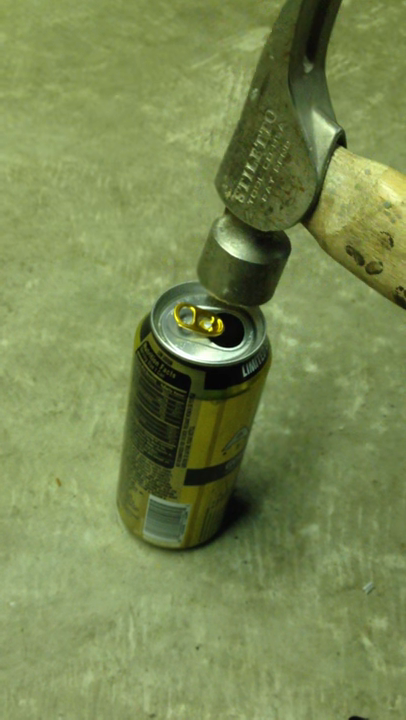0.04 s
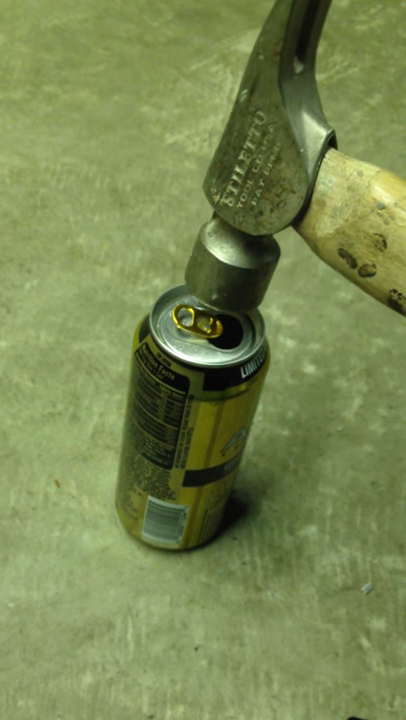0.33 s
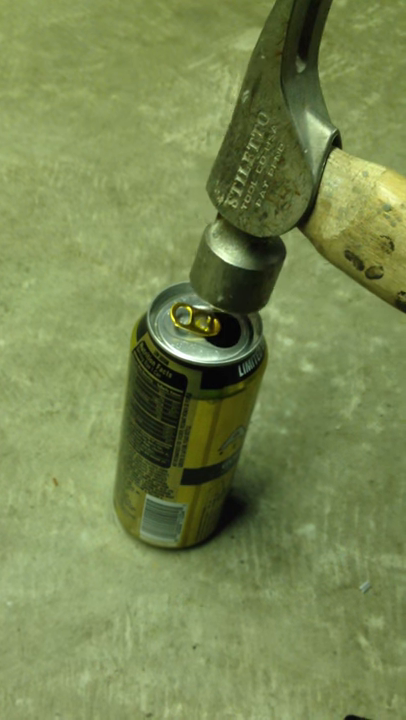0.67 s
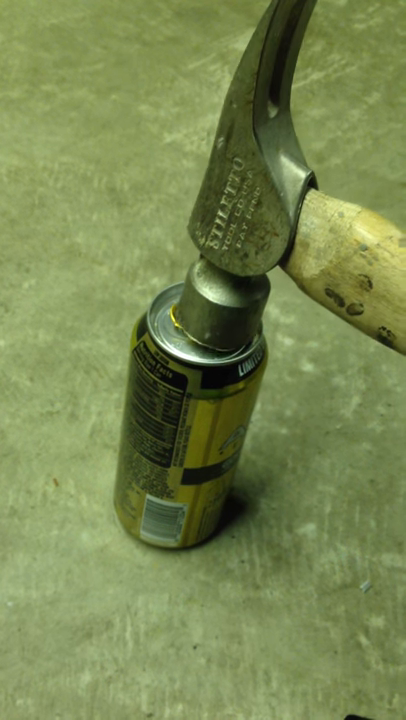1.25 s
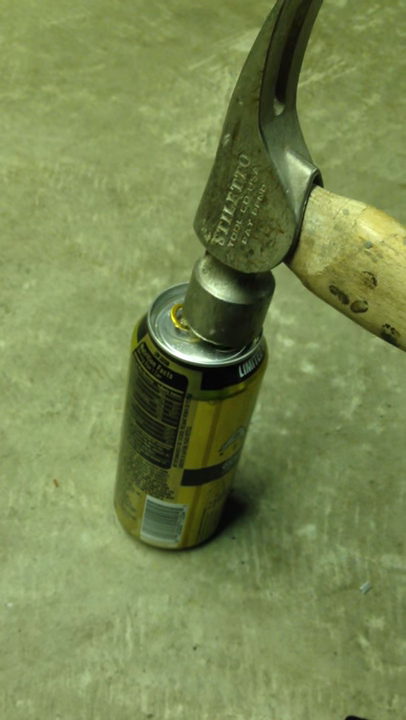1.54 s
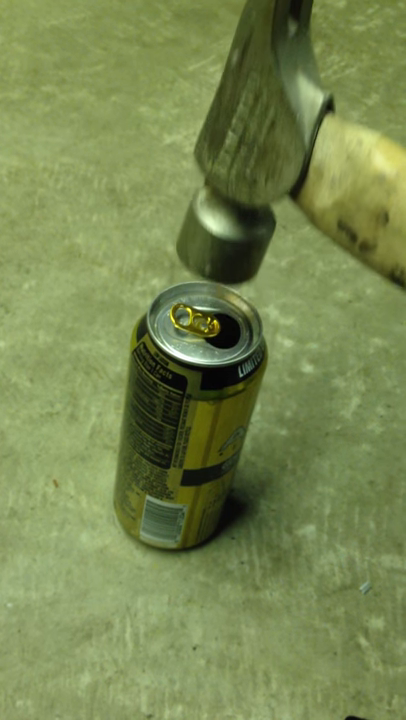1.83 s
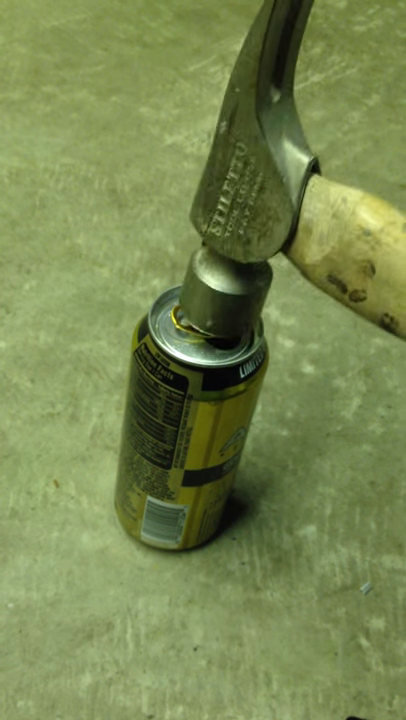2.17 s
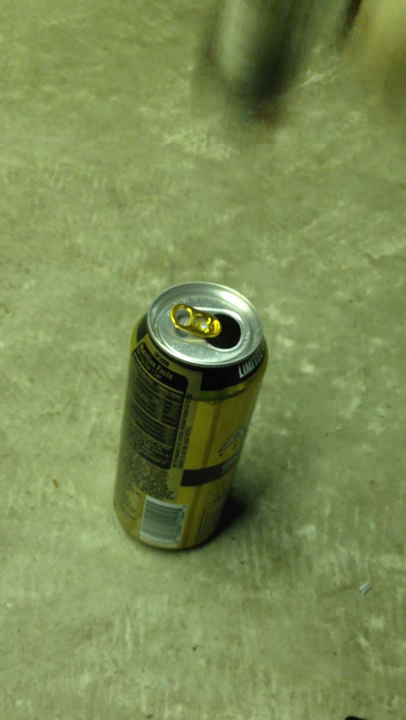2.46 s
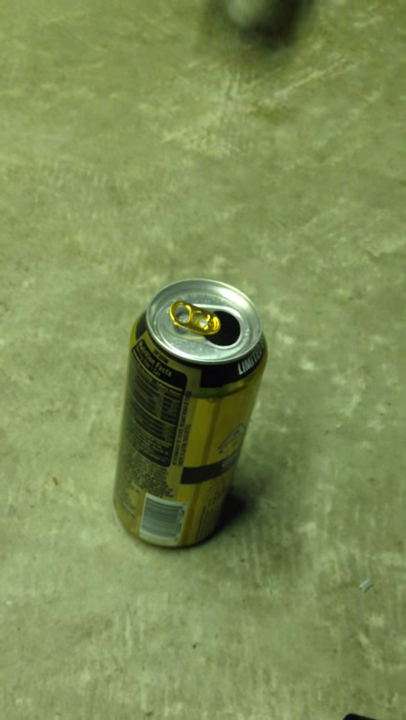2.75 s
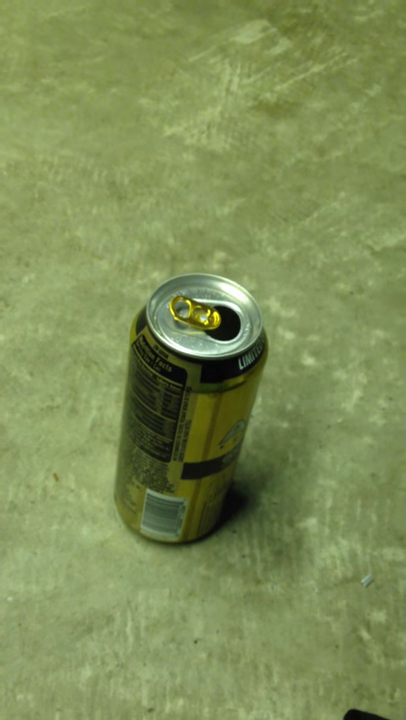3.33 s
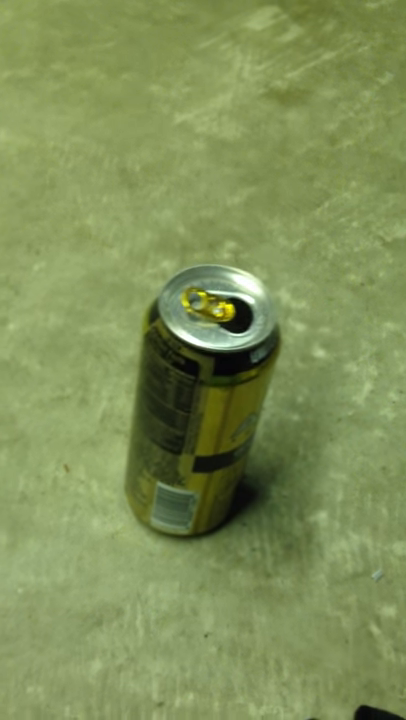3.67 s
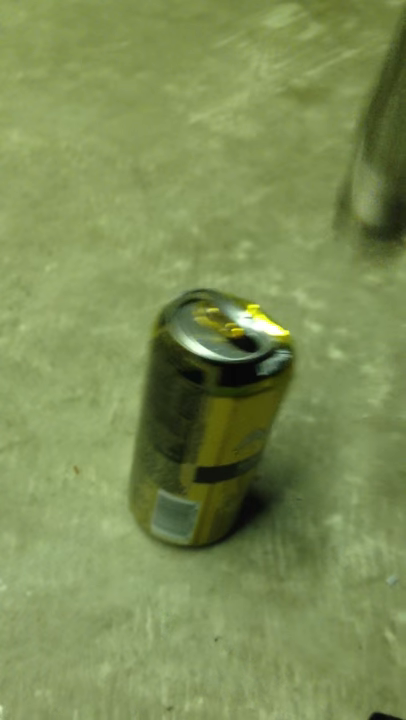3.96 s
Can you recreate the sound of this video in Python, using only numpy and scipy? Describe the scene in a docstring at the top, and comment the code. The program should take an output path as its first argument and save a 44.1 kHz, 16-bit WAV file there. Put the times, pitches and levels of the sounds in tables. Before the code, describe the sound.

One sharp, crunching hammer blow on an empty can follows a light tink and quiet hum.

```python
"""In a small hard room, an empty drink can stands on the concrete floor. A hammer is lined up,
touches the lid once, then swings down. The impact excites the can's modes: the lid cracks and clanks,
the can thumps against the floor, and its thin wall buckles and rings. The room reverberates and
the bang overloads the microphone. Underneath are mains hum, faint hiss and the swish of the arm."""
import sys
import numpy as np
from scipy import signal
from scipy.fft import rfft, irfft
from scipy.io import wavfile

SR = 44100
rng = np.random.default_rng(int(sys.argv[2]) if len(sys.argv) > 2 else 0)


def output_pcm(signal):
    """Save a mono or channel-first signal as 16-bit PCM at the path in sys.argv[1].

    Samples are clipped to [-1, 1] before scaling.
    """
    pcm = np.clip(np.atleast_2d(signal).T, -1, 1) * 32767
    wavfile.write(sys.argv[1], SR, np.round(pcm).astype(np.int16))


N = 176400
EVENT_N = 16384  # samples in one impact
BLOW_S = 3.8413

def undb(db):
    """Amplitude ratio of a level in decibels."""
    return 10 ** (np.asarray(db) / 20)

def since(start):
    """Seconds since an onset within one impact, zero before it."""
    return np.maximum(np.arange(EVENT_N) / SR - start, 0)

def fade(start, t60):
    """Exponential decay from a sudden onset, 60 dB in t60 seconds."""
    age = since(start)
    return (age > 0) * np.exp(-np.log(1000) * age / t60)

def on_log(hz, points, column=1):
    """Interpolation of a table column on a log-frequency axis."""
    points = np.array(points, float)
    return np.interp(np.log(np.maximum(hz, 1)), np.log(points[:, 0]), points[:, column])

def colour(x, points):
    """Spectral shaping by relative levels, conserving the power of white noise."""
    gain = undb(on_log(np.fft.rfftfreq(len(x), 1 / SR), points))
    return irfft(rfft(x) * gain / np.sqrt(np.mean(gain ** 2)), len(x))

def noise(points, size=N):
    """Coloured Gaussian noise of unit power."""
    return colour(rng.standard_normal(size), points)

def ring(start, modes, wave=np.sin):
    """Free vibration: a sum of damped modes excited together."""
    age = since(start)
    return sum(undb(db) * fade(start, t60) * wave(2 * np.pi * hz * age) for hz, db, t60 in modes)

def place(x, start):
    """Delay of a short sound to its time in the scene."""
    return np.concatenate([np.zeros(int(start * SR)), x, np.zeros(N)])[:N]

# Partials of the hum (multiple of hum_hz, level/dB)
HUM_PARTIALS = [(1, -74), (2, -82.5), (2.5, -79.5), (3, -65.5), (4, -72.5), (5, -75), (6, -75), (7, -85.5),
                (8, -79.5), (9, -85.5), (10, -85.5), (11, -82.5), (12, -79), (14, -85), (15, -82.5),
                (16, -86), (20, -90.5), (21, -91)]

def mains_hum(hum_hz=120.1, scatter_rad=1.08):
    """Harmonic series: steady multiples of the mains frequency, loosely aligned in phase."""
    phase = 2 * np.pi * hum_hz * np.arange(N) / SR
    offsets = scatter_rad * rng.standard_normal(len(HUM_PARTIALS))
    return sum(np.sqrt(2) * undb(db) * np.cos(multiple * phase + offset)
               for (multiple, db), offset in zip(HUM_PARTIALS, offsets))

# Spectral density of the hiss (f/Hz, relative level/dB)
HISS_SPECTRUM = [(25, -28), (60, -24), (90, -9.5), (120, 0.5), (200, 1.5), (320, -2.5), (550, -6.5),
                 (1000, -9.5), (1700, -13.5), (2800, -16), (4300, -14.5), (5500, -16.5), (7200, -16),
                 (9800, -26.5), (12000, -21), (14500, -16.5), (16000, -19)]

def hiss(level_db=-68):
    """Stationary broadband noise of the air and the microphone."""
    return undb(level_db) * noise(HISS_SPECTRUM)

# Aiming and lifting movements (centre t/s, half-width/s, level/dB)
ARM_MOVES = [(0.31, 0.35, -71.5), (2.593, 0.19, -68.5), (3.4, .15, -78)]
# Spectral density of their swish (f/Hz, relative level/dB)
SWISH_SPECTRUM = [(100, -15), (200, 3), (320, 0.5), (500, -11), (900, -6.5), (2000, -12), (4000, -27),
                  (15000, -43)]
# Spectral density of the downswing (f/Hz, relative level/dB)
DOWNSWING_SPECTRUM = [(100, -17), (250, 4), (700, -5), (2000, -5.5), (4500, -10), (8000, -20), (15000, -38)]

def arm(swing_db=-53.5, rise_s=0.035):
    """Noise of motion: arm and hammer swish softly, then a rush grows exponentially up to the blow."""
    t = np.arange(N) / SR
    moves = sum(undb(db) * np.exp(-((t - centre) / half) ** 2) for centre, half, db in ARM_MOVES)
    swing = (t < BLOW_S) * np.exp(-np.abs(t - BLOW_S) / rise_s)
    return moves * noise(SWISH_SPECTRUM) + undb(swing_db) * swing * noise(DOWNSWING_SPECTRUM)

# Spectral density and decay of the reflections (f/Hz, relative level/dB, T60/s)
ROOM_RESPONSE = [(60.7, -40, .3), (172, -10.5, 0.62), (300, -9, 0.54), (650, -14, .5), (900, -7, 0.83),
                 (1170, -10, 0.54), (1750, -2.5, 0.71), (2600, 1.5, 0.58), (3250, -4.5, 0.55),
                 (4300, 1.5, 0.42), (5530, -3, 0.5), (7400, 2.5, 0.37), (8550, 1, .34), (9500, -12, 0.4),
                 (12000, -7.5, 0.35), (15500, -12, 0.31)]

def reverberation(build_s=0.0065):
    """Diffuse field: dense reflections merge into noise, each band decaying at its own rate."""
    edges = np.geomspace(50, 16000, 41)
    centres = np.sqrt(edges[1:] * edges[:-1])
    t60s = on_log(centres, ROOM_RESPONSE, column=2)
    hz = np.fft.rfftfreq(EVENT_N, 1 / SR)
    spectrum = rfft(noise(ROOM_RESPONSE, EVENT_N))
    tail = sum(irfft(spectrum * ((hz >= low) & (hz < high))) * fade(0, t60)
               for low, high, t60 in zip(edges, edges[1:], t60s))
    return tail * (1 - np.exp(-since(0) / build_s))

# The hammer's light contact and its rebound (t/s, level/dB)
TOUCH_CONTACTS = [(1.3584, -46.5), (1.3648, -52)]
# Modes of the intact lid (f/Hz, relative level/dB, T60/s)
INTACT_LID_MODES = [(2480, -12.5, 0.037), (3128, -19, .05), (4620, -2.5, 0.039), (4670, -9, .03),
                    (4660, -13, 0.13), (5830, -22, .05), (7025, -16.5, .055), (8500, -22, .03)]

def touch(room, tick_db=-15, rise_s=0.00036, room_db=-17.5):
    """Light impact excitation: the lid tinks, and convolution with the room adds the reflections."""
    tick = undb(tick_db) * noise(CAN_NOISE_SPECTRUM, EVENT_N) * fade(0, t60=0.035)
    tink = (ring(0, INTACT_LID_MODES) + tick) * (1 - np.exp(-since(0) / rise_s))
    reflections = signal.fftconvolve(tink, room / np.linalg.norm(room))[:EVENT_N]
    contact = tink + undb(room_db) * reflections
    return sum(place(undb(db) * contact, start) for start, db in TOUCH_CONTACTS)

# Low modes of the can against the floor (f/Hz, relative level/dB, T60/s)
CAN_FLOOR_MODES = [(169, -19.5, 0.043), (265, -15, 0.029), (370, -18, 0.028), (472, -21.5, 0.036)]

def thump(lag_s=0.00149, pulse_db=-16.5, pulse_s=0.00039):
    """Impulse response of the can driven against the floor: a pressure pulse and damped low modes."""
    age = since(lag_s) / pulse_s
    pulse = undb(pulse_db) * age * np.exp(1 - age)
    return ring(lag_s, CAN_FLOOR_MODES, np.cos) + pulse

# Spectral density of the wall's snaps, also of the touch's tick (f/Hz, relative level/dB)
CAN_NOISE_SPECTRUM = [(60, -34), (300, -6.5), (800, -13), (1150, -13.5), (1450, -2.5), (3200, -3),
                      (4400, -0.5), (5500, -5.5), (7000, 3.5), (9800, -9), (12000, -6), (15500, -7)]
# Modes of the thin wall and the air inside (f/Hz, relative level/dB, T60/s)
SHELL_MODES = [(777, -41, 2), (871, -37.5, 1.5), (888, -46, 1.2), (1066, -43, .5), (1347, -21, .09),
               (1365, -32, .35), (1510, -33, .15), (1691, -41, 1.3), (1781, -36, .8), (1843, -31, .32),
               (2016, -30, .32), (2230, -27, .2), (2448, -24, .2), (2612, -27, .25), (2650, -26, .3),
               (2826, -29, .32), (2903, -41, .9), (3476, -22, .11), (3640, -38, .75), (4150, -26, .19),
               (4367, -30, .25), (4879, -20, .07), (6583, -30, .2), (7010, -29, .19), (7300, -27, .19),
               (7413, -27, .19), (7601, -24, .1), (8250, -26, .16), (8705, -32, .18), (10947, -36, .18),
               (11952, -34, .18)]

def wall_buckling(lag_s=0.005, snaps_per_s=2900, crumple_db=-10, ring_db=-1.5):
    """Buckling of a thin shell: the wall gives way in tiny random snaps and its modes ring on."""
    chance = snaps_per_s / SR
    snaps = rng.standard_normal(EVENT_N) * (rng.random(EVENT_N) < chance) / np.sqrt(chance)
    crumple = undb(crumple_db) * colour(snaps, CAN_NOISE_SPECTRUM) * fade(lag_s, t60=0.1)
    return crumple + undb(ring_db) * ring(lag_s, SHELL_MODES)

# Spectral density of the crack at first contact (f/Hz, relative level/dB)
CRACK_SPECTRUM = [(60, -27), (200, -13), (800, -13), (1000, -11), (1300, -14), (1800, -8), (2800, -1.5),
                  (4500, -13), (7000, -11), (9800, -20), (12000, -3.5), (15500, -19)]
# Modes of the dented lid (f/Hz, relative level/dB, T60/s)
DENTED_LID_MODES = [(2640, -4.5, 0.039), (2592, -13.5, 0.031), (3615, -12.5, 0.052)]

def lid_impact(crack_db=-7):
    """A brief contact has a broad spectrum: the lid cracks and clanks in heavily damped modes."""
    crack = undb(crack_db) * noise(CRACK_SPECTRUM, EVENT_N) * fade(0, t60=0.031)
    return crack + ring(0, DENTED_LID_MODES)

def blow(room, room_db=-22):
    """Inelastic collision: the hammer crushes the can, and a reverberant tail follows the bang."""
    direct = lid_impact() + thump() + wall_buckling()
    return place(direct + undb(room_db) * room, BLOW_S)

def scene():
    """Linear superposition of all sources at one microphone."""
    room = reverberation()
    return (mains_hum() + hiss() + arm() + touch(room) + blow(room))[None]

def record(dry, ceiling=0.61, cutoff_hz=15200):
    """Saturation and band limiting: the microphone rounds off the bang, a low-pass cuts the top."""
    saturated = ceiling * np.tanh(dry / ceiling)
    lowpass = signal.ellip(10, 0.2, 80, cutoff_hz, fs=SR, output="sos")
    return signal.sosfilt(lowpass, saturated)

dry = scene()
out = record(dry)
output_pcm(out)
```